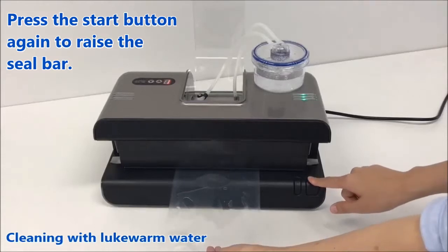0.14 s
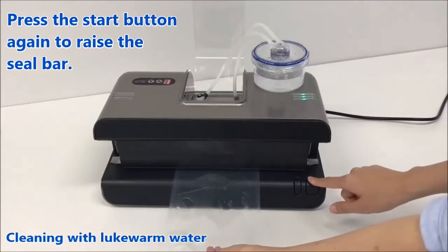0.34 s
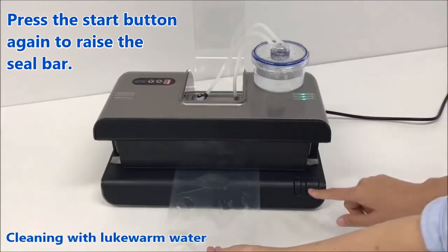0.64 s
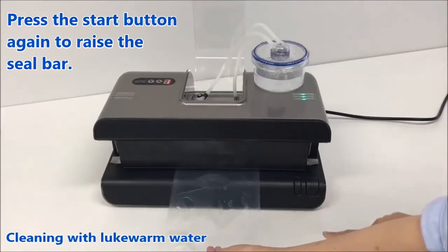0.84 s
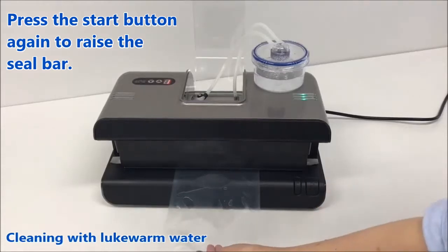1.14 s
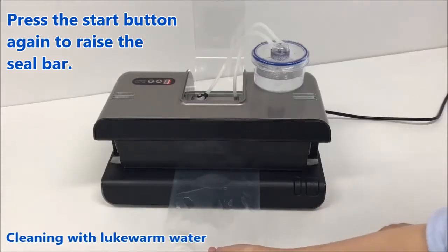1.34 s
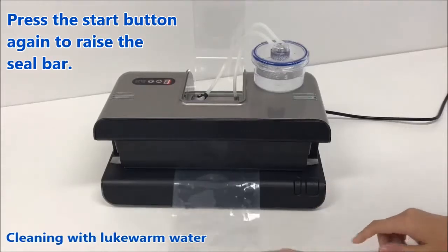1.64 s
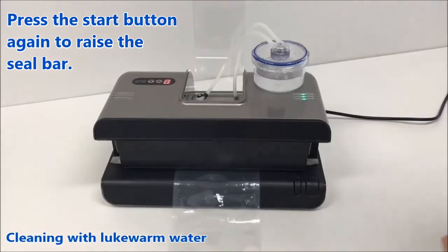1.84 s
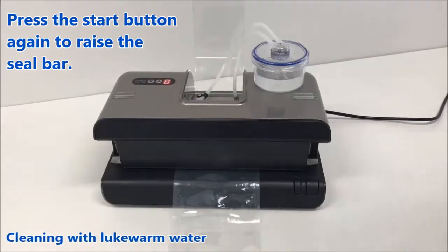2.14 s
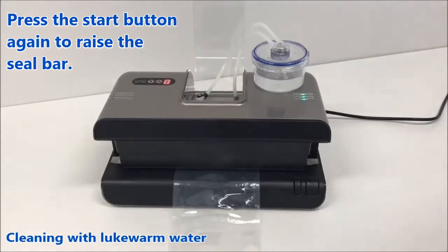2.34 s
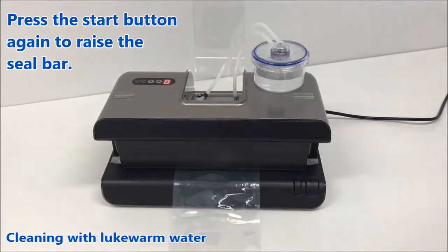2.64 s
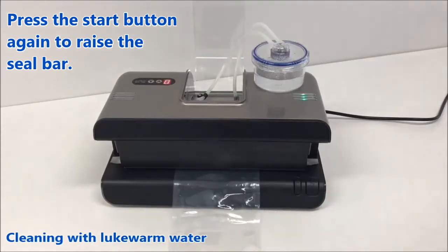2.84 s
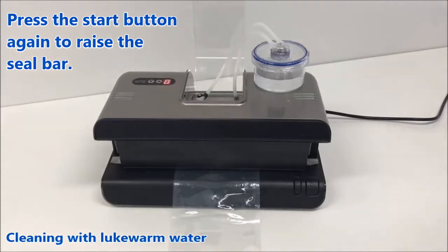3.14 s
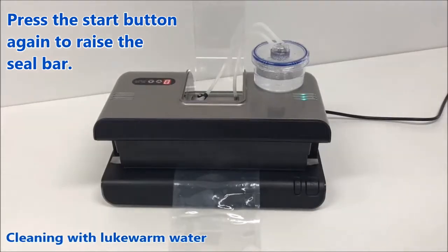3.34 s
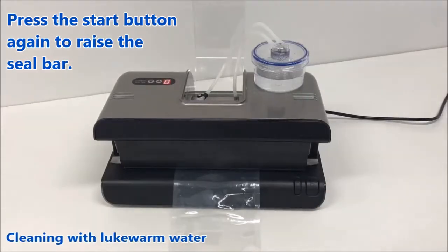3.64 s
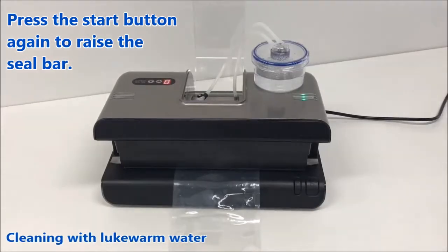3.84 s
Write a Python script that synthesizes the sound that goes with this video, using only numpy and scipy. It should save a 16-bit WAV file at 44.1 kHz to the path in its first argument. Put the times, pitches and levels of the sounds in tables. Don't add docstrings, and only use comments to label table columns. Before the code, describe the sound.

Vacuum sealer motor cuts off, then a hissing, whistling air release sputters wetly into quiet.

```python
import sys
import numpy as np
from scipy import signal
from scipy.fft import rfft, irfft
from scipy.io import wavfile

SR = 44100
rng = np.random.default_rng(int(sys.argv[2]) if len(sys.argv) > 2 else 0)


def int16_out(signal):
    q = np.round(np.clip(np.atleast_2d(signal).T, -1, 1) * 32767)
    wavfile.write(sys.argv[1], SR, q.astype(np.int16))


def makeup_ratio(level_db):
    decades = np.asarray(level_db, float) / 20
    return 10 ** decades


N = 176400

# (order, level/dB)
SHAFT_ORDERS = [(1, -14), (2, 0), (3, -8), (4, -13), (5, -5), (6, -6), (7, -2.5), (8, -11), (9, -16),
                (10, -14), (11, -20), (12, -18), (13, -13), (14, -29), (15, -25), (16, -24), (17, -23),
                (18, -23), (19, -25), (20, -11), (21, -20), (22, -16), (23, -29), (24, -27), (25, -26),
                (26, -19), (27, -19), (28, -21), (29, -30), (30, -23), (31, -24), (32, -25)]
# (f/Hz, level/dB, T60/s)
HOUSING_MODES = [(2990, -41, 0.023), (3850, -33.5, 0.0065), (4740, -34, 0.011), (5670, -36, 0.014)]
# (f/Hz, level/dB, T60/s)
VALVE_MODES = [(1100, -42, .02), (1450, -36, .022), (1700, -36, .022)]
# (f/Hz, density level/dB per Hz)
RATTLE_SPECTRUM = [(90, -19), (368, -5.5), (480, -14.5), (1000, -7.5), (1700, -15.5), (2200, -21),
                   (3830, -17), (15600, -33)]
# (t/s, f/Hz, level/dB)
ROTOR_WHINE = [
    (0, 3756, -39.5),
    (.11, 3726, -42),
    (.16, 3816, -47.5),
    (.27, 3910, -52),
    (.33, 3880, -63),
]
PUMP_HZ, PUMP_DB, RATTLE_DB, RATTLE_GATE = 52.58, -33.5, -37.5, 0.2
WOBBLE_DB, KNOCK_SPREAD_DB, VALVE_LAG_TURNS = .6, 1.8, .6
OFF_S, COAST_S, COAST_LOSS, OFF_DROP_DB, TONE_DROP_DB = .275, .16, 1.04, -3, -7
RATTLE_SPLIT_HZ, BRIGHT_COAST_S, RUMBLE_DB, RUMBLE_S = 1250, 0.079, -45, 0.18

# (t/s, level/dB)
FLOW_LEVEL = [
    (0, -54),
    (.3, -49),
    (.85, -51),
    (.97, -51.5),
    (1.3, -56),
    (1.42, -55),
    (1.8, -57.5),
    (1.9, -63.5),
    (2.14, -77.5),
    (2.6, -78),
]
# (f/Hz, density level/dB per Hz)
HISS_SPECTRUM = [(500, -12), (1500, -14), (2800, -22), (3500, -17), (7110, -2.5), (10400, -3),
                 (12200, -6.5), (15600, -6)]
# (f/Hz, width/Hz, level/dB)
PASSAGE_MODES = [(3820, 1150, -5), (5460, 1100, -6), (6930, 600, -13), (9890, 100, -11.5),
                 (11700, 250, -14), (12630, 460, -10)]
HISS_DB, SEEP_DB, SEEP_END_S = 2.5, -69.5, 2.17

# (t/s, f/Hz, level/dB, roughness 0-1)
DRY_WHISTLE = [(.47, 7180, -47, 0.8), (.52, 7240, -51.5, 0.64), (0.749, 7200, -54.5, 0.9),
               (0.849, 7130, -46.5, 0.44), (.865, 6820, -59, 1.1), (0.961, 6330, -55.5, 1),
               (1.08, 6134, -50.5, 0.3), (1.259, 5774, -46, 0.25), (1.38, 5305, -46, 0.42),
               (1.452, 4870, -53, 0.47), (1.6, 4492, -40, 0.01), (1.667, 4450, -36, 0.06)]
# (t/s, f/Hz, level/dB, roughness 0-1)
WET_WHISTLE = [
    (1.678, 4200, -54, .5),
    (1.697, 4240, -45.5, 0.22),
    (1.706, 4430, -44, .2),
    (1.713, 4270, -50, 0.3),
    (1.735, 4440, -40.5, 0),
    (1.752, 4480, -47, 0.32),
    (1.766, 4720, -47, 0.1),
    (1.797, 4400, -54, .3),
    (1.82, 4170, -64, 0.9),
]
# (f/Hz, level/dB)
OVERTONE_RADIATION = [(8900, -28), (10300, -12), (11000, -9), (11700, -5), (12700, -1), (13400, -20),
                      (14000, -12), (15500, -18)]
WHISTLE_WIDTH_HZ, HALO_WIDTH_HZ, HALO_DB, BREAKUP_DB = 70, 400, -6, 2.5
WATER_IN_S, OVERTONES_START_S, CUTOFF_HZ = 1.668, .88, 15720

# (t/s, level/dB, f/Hz)
WHISTLE_DROPS = [(.978, -45, 5500), (1.008, -44, 5400), (1.041, -41, 5400), (1.06, -43, 5400),
                 (1.092, -41, 5350), (1.12, -45, 5500), (1.144, -41, 5450), (1.17, -45, 5500),
                 (1.192, -39, 5450), (1.2, -42, 5500), (1.212, -43, 5500), (1.227, -35, 5400),
                 (1.254, -40, 5450), (1.282, -32, 5250), (1.348, -38, 5150), (1.358, -38, 5200)]
# (t/s, level/dB, f/Hz)
WATER_SPUTTERS = [(0.394, -37.5, 3600), (.857, -46, 3760), (1.674, -35.5, 3650), (1.682, -46, 4600),
                  (1.754, -40, 3860), (1.762, -45, 4600), (1.815, -50, 3900), (1.826, -42.5, 3190),
                  (1.833, -44, 4000), (1.843, -45, 3300), (1.848, -45, 3700), (1.856, -44, 3680),
                  (1.862, -46, 3650), (1.83, -48, 4900), (0.99, -45, 5600), (1.826, -46, 6450),
                  (1.873, -50, 6000), (1.797, -49, 5330), (1.838, -46, 5330), (1.754, -46, 5330),
                  (1.6, -47, 6400), (1.676, -47, 7300), (2, -50, 7900)]
DROP_T60_S, DROP_RISE, SPUTTER_T60_S, SPUTTER_RISE = .022, 12, .03, 3.0
SPRAY_START_S, SPRAY_END_S, SPRAY_PER_S, SPRAY_DB, SPRAY_UNDER = .88, 1.3, 300, -45, .14

# (t/s, peak level/dB, f/Hz, sharp edge level/dB)
BAR_CREAKS = [(.392, -44, 3300, -14), (.485, -50, 1000, -20), (.715, -50, 2000, -20),
              (1.48, -53, 1500, -20), (.545, -50.5, 2490, -20), (.45, -35, 1220, -9),
              (0.545, -46, 1230, -8), (0.761, -40, 3530, 16.5), (.8, -46.5, 1510, 4),
              (0.831, -43, 2590, -12), (.956, -55, 1000, -6), (1.011, -50, 1500, -6),
              (1.159, -45, 2290, -17), (1.4, -52, 982, -17), (1.536, -48, 1164, -8),
              (1.59, -49.5, 1090, -14), (1.67, -49, 4100, 10), (1.752, -49, 3580, -7),
              (1.706, -48.5, 2110, -4), (1.777, -50, 2690, 15), (1.782, -41, 840, -20),
              (1.829, -44.5, 3180, -10)]
CREAK_T60_S, EDGE_T60_S, CREAK_SPREAD, CREAK_TONE_DB = .035, .025, 1.7, -8
# (t/s, level/dB, f/Hz)
TABLE_BUMPS = [
    (0.765, -37, 1055),
    (1.783, -33, 1137),
    (1.79, -42.5, 1250),
    (1.783, -44, 400),
    (2.344, -34, 167),
    (2.345, -42.5, 303),
    (3.91, -52, 840),
    (.452, -44, 1500),
    (.452, -44, 1150),
    (.393, -47, 2400),
]
BUMP_CYCLES, BUMP_T60_S = 12, .022

# (f/Hz, density level/dB per Hz)
SLEEVE_SPECTRUM = [(500, -8), (1200, -4.5), (3000, -2.5), (9010, -3), (12500, -6.5), (15600, -14)]
SLEEVE_S, SLEEVE_WIDTH_S, SLEEVE_LAG_S, SLEEVE_AFTER_S = 2.638, .045, .011, 2.83
SLEEVE_DB, SLEEVE_AFTER_DB = -51.5, -19.5

# (f/Hz, density level/dB per Hz)
AIR_SPECTRUM = [(20, -14), (45, -2), (119, -3), (300, -11.5), (450, -22.5), (1200, -27), (3000, -37),
                (8000, -45.5), (15600, -44.5)]
# (f/Hz, width/Hz, level/dB)
VENTILATION_HUMS = [(64.3, 16, -58.5), (119.7, 14, -55.5), (194, 14, -62.5), (12360, 1500, -75.5)]
# (f/Hz, width/Hz, level/dB)
SPECTRAL_DIPS = [(4826, 290, -6.5), (7610, 330, -6.5), (10480, 380, -14.5)]
AIR_DB, AIR_DIP_SHARE, ROOM_T60_S, ROOM_DB = -52.5, 0.39, .4, -22
# (t/s, low f/Hz, high f/Hz, level/dB)
ANTIPHASE_BURSTS = [
    (.36, 8900, 10400, -62),
    (1.36, 5100, 6300, -48),
    (1.523, 5700, 7600, -64),
    (1.523, 8300, 9700, -64),
    (1.964, 4200, 5200, -76),
    (1.964, 9600, 11000, -78),
]
BURST_S = .009
TICK_START_S, TICK_EVERY_S, TICK_DB = .1, .10238, -52


def pump():
    after = np.maximum(np.arange(N) / SR - OFF_S, 0)
    speed = np.exp(-(after / COAST_S) ** 2 / 2)
    turns = np.cumsum(PUMP_HZ * speed) / SR
    tone = 0
    for order, db in SHAFT_ORDERS:
        phase = 2 * np.pi * (order * turns + rng.random())
        tone = tone + makeup_ratio(db + WOBBLE_DB * drift(8)) * np.sin(phase)
    knocks = mode_knocks(turns, HOUSING_MODES, 0) + mode_knocks(turns, VALVE_MODES, VALVE_LAG_TURNS)
    tone_drop = makeup_ratio(TONE_DROP_DB * np.minimum(after / 0.012, 1))
    tonal = tone_drop * (makeup_ratio(PUMP_DB) * np.sqrt(2) * tone + knocks)

    rattle = coloured(RATTLE_SPECTRUM)
    dull = signal.sosfiltfilt(signal.butter(2, RATTLE_SPLIT_HZ, fs=SR, output="sos"), rattle)
    rattle = dull + (rattle - dull) * np.exp(-after / BRIGHT_COAST_S)
    gust = 1 + RATTLE_GATE * np.cos(2 * np.pi * (turns + 1.12))

    switch_loss = makeup_ratio(OFF_DROP_DB * (1 - np.exp(-after / 0.011)))
    loss = switch_loss * np.exp(-COAST_LOSS * after / COAST_S) * np.sqrt(speed)
    return loss * (tonal + makeup_ratio(RATTLE_DB) * gust * rattle) + coasting_rumble(after) + rotor_whine(after)


def mode_knocks(turns, modes, lag):
    strikes = np.diff(np.floor(turns + .5 - lag), prepend=np.floor(.5 - lag))
    out = 0
    for hz, db, t60 in modes:
        force = makeup_ratio(db + KNOCK_SPREAD_DB * rng.standard_normal(N))
        out = out + ring(strikes * force, hz, t60)
    return out


def coasting_rumble(after):
    noise = narrow(68, 40) + 0.82 * narrow(325, 210)
    return makeup_ratio(RUMBLE_DB) * noise * np.minimum(after / 0.035, 1) * np.exp(-(after / RUMBLE_S) ** 2)


def rotor_whine(after):
    hz, db = in_time(ROTOR_WHINE)
    sine = np.sin(2 * np.pi * np.cumsum(hz) / SR)
    return np.sqrt(2) * makeup_ratio(db + 0.5 * drift(25)) * sine * (after < .06)


def vent_hiss():
    flow_db, = in_time(FLOW_LEVEL)
    t = np.arange(N) / SR
    hiss = makeup_ratio(HISS_DB) * coloured(HISS_SPECTRUM)
    for hz, width_hz, db in PASSAGE_MODES:
        hiss = hiss + makeup_ratio(db + 1.45 * drift(11)) * narrow(hz, width_hz)
    shut = np.clip((2.9 - t) / .3, 0, 1)
    seep = makeup_ratio(SEEP_DB) * (narrow(4000, 1500) + 0.43 * narrow(6100, 1400))
    seep = seep * np.clip((SEEP_END_S - t) / 0.073, 0, 1)
    return seep + shut * makeup_ratio(flow_db + 1.0 * drift(21)) * hiss


def vent_whistle():
    t = np.arange(N) / SR
    hz, db, rough = in_time(DRY_WHISTLE + WET_WHISTLE)
    wet = t > WATER_IN_S
    breakup = 1 - .6 * (t > .5) * ~wet
    db = db + breakup * BREAKUP_DB * drift(45) - 9 * (t < .5) - 6 * (t < .45)
    hz = hz * (1 + .009 * wet * drift(60))
    rough = np.clip(rough, 0, 1)
    phase = 2 * np.pi * np.cumsum(hz) / SR
    out = 0
    for k in (1, 2, 3):
        breathy = complex_drift(k * WHISTLE_WIDTH_HZ)
        halo = complex_drift(k * HALO_WIDTH_HZ / 2)
        gain_db = 0
        if k > 1:
            gain_db = at_hz(OVERTONE_RADIATION, k * hz) - 200 * (k * hz > CUTOFF_HZ) - 8 * wet
            gain_db = gain_db - 15 * (t < OVERTONES_START_S) - 6 * (t < 1.08) + 2.5 * drift(25)
        blur = np.clip(rough + (k > 1) * (t < 1.08), 0, 1)
        voice = np.sqrt(1 - blur ** 2) + blur * breathy + makeup_ratio(HALO_DB) * np.sqrt(k * blur) * halo
        out = out + makeup_ratio(db + gain_db) * np.real(voice * np.exp(1j * k * phase))
    return np.sqrt(2) * out * (t > .28) * (t < 1.88)


def water_drops():
    out = np.zeros(N + SR)
    times, pitch = np.transpose(DRY_WHISTLE)[:2]
    span = SPRAY_END_S - SPRAY_START_S
    spray = []
    for when, soft, under in rng.random((int(SPRAY_PER_S * span), 3)):
        s = SPRAY_START_S + span * when
        hz = np.interp(s, times, pitch) * (1 - SPRAY_UNDER * (0.21 + under))
        spray.append((s, SPRAY_DB - 10 * soft, hz))
    for s, db, hz in WHISTLE_DROPS + spray:
        add(out, s, blip(db, hz, DROP_T60_S, DROP_RISE))
    for s, db, hz in WATER_SPUTTERS:
        add(out, s, blip(db, hz, SPUTTER_T60_S, SPUTTER_RISE))
    return out[:N]


def bar_creaks():
    t = np.arange(SR // 10) / SR
    out = np.zeros(N + SR)
    bright = signal.butter(1, 6000, "high", fs=SR, output="sos")
    for s, db, hz, edge_db in BAR_CREAKS:
        white = rng.standard_normal((2, len(t)))
        limits = [hz / CREAK_SPREAD, hz * CREAK_SPREAD]
        body = signal.sosfilt(signal.butter(2, limits, "band", fs=SR, output="sos"), white[0])
        knock = rms_one(body) * makeup_ratio(db - 60 * t / CREAK_T60_S) * (1 - np.exp(-t / 0.0026))
        knock = knock + blip(db + CREAK_TONE_DB, hz, CREAK_T60_S)
        edge = signal.sosfilt(bright, white[1]) * makeup_ratio(db + edge_db - 60 * t / EDGE_T60_S)
        add(out, s, knock + edge * (1 - np.exp(-t / 0.0019)))
    return out[:N]


def table_bumps():
    out = np.zeros(N + SR)
    for s, db, hz in TABLE_BUMPS:
        add(out, s, blip(db, hz, BUMP_T60_S + BUMP_CYCLES / hz, attack_s=0.0009))
    return out[:N]


def sleeve():
    t = np.arange(N) / SR
    spectrum = rfft(coloured(SLEEVE_SPECTRUM))
    octave = np.log2(12000 / (np.arange(N // 2 + 1) * SR / N + 1))
    out = 0
    for k in range(6):
        weight = np.clip(1 - np.abs(np.clip(octave, 0, 5) - k), 0, 1)
        band = irfft(spectrum * weight, N)
        for s, db in ((SLEEVE_S, 0), (SLEEVE_AFTER_S, SLEEVE_AFTER_DB)):
            out = out + makeup_ratio(db) * band * np.exp(-((t - s - k * SLEEVE_LAG_S) / SLEEVE_WIDTH_S) ** 2 / 2)
    return makeup_ratio(SLEEVE_DB) * out


def room(x):
    t = np.arange(SR // 2) / SR
    tail = signal.lfilter([1], [1, -.7], rng.standard_normal(len(t)))
    tail = tail * makeup_ratio(-60 * t / ROOM_T60_S) * (t > .008)
    return x + makeup_ratio(ROOM_DB) * signal.fftconvolve(x, tail / np.sqrt(np.sum(tail ** 2)))[:N]


def dipped(x, share):
    f = np.arange(N + 1) * SR / N / 2
    dip_db = sum(db / (1 + (2 * (f - hz) / w) ** 2) for hz, w, db in SPECTRAL_DIPS)
    return irfft(rfft(x, 2 * N) * makeup_ratio(share * dip_db), 2 * N)[:N]


def ventilation():
    hums = sum(makeup_ratio(db) * narrow(hz, w) for hz, w, db in VENTILATION_HUMS)
    return makeup_ratio(AIR_DB) * coloured(AIR_SPECTRUM) + hums


def antiphase_bursts():
    t, out = np.arange(N) / SR, 0
    white = rng.standard_normal(N)
    for s, low, high, db in ANTIPHASE_BURSTS:
        band = signal.sosfilt(signal.butter(6, [low, high], "band", fs=SR, output="sos"), white)
        out = out + makeup_ratio(db) * rms_one(band) * np.exp(-((t - s) / BURST_S) ** 2 / 2)
    return out * [[1], [-1]]


def electric_ticks():
    ticks = np.zeros(N)
    at = (np.arange(TICK_START_S, N / SR, TICK_EVERY_S) * SR).astype(int)
    ticks[at] = makeup_ratio(TICK_DB + 2 * rng.standard_normal(len(at)))
    return 2.5 * signal.sosfilt(signal.butter(2, 12500, "high", fs=SR, output="sos"), ticks)


def rms_one(x):
    return x / np.sqrt(np.mean(np.abs(x) ** 2) + 1e-20)


def in_time(rows):
    s, *columns = np.transpose(rows)
    return [np.interp(np.arange(N) / SR, s, c) for c in columns]


def at_hz(points, hz):
    f, db = np.transpose(points)
    return np.interp(np.log(hz), np.log(f), db)


def coloured(points):
    gain = makeup_ratio(at_hz(points, np.arange(N // 2 + 1) * SR / N + 1))
    return rms_one(irfft(rfft(rng.standard_normal(N)) * gain, N))


def narrow(hz, width_hz):
    f = np.arange(N // 2 + 1) * SR / N
    return rms_one(irfft(rfft(rng.standard_normal(N)) / (1 + (2 * (f - hz) / width_hz) ** 2), N))


def drift(rate):
    return narrow(0, 2 * rate)


def complex_drift(rate):
    return (drift(rate) + 1j * drift(rate)) / np.sqrt(2)


def ring(clicks, hz, t60):
    r, w = makeup_ratio(-60 / (t60 * SR)), 2 * np.pi * hz / SR
    return signal.lfilter([0, np.sin(w)], [1, -2 * r * np.cos(w), r * r], clicks + 1e-18)


def blip(db, hz, t60, rise=0., attack_s=0.00048):
    t = np.arange(SR // 10) / SR
    envelope = makeup_ratio(db - 60 * t / t60) * (1 - np.exp(-t / attack_s))
    return envelope * np.sin(2 * np.pi * hz * t * (1 + rise * t / 2))


def add(out, s, x):
    out[int(s * SR):int(s * SR) + len(x)] += x


def scene():
    sealer = pump() + vent_hiss() + vent_whistle()
    near = sealer + water_drops() + bar_creaks() + table_bumps() + sleeve()
    mono = dipped(room(near), 0.96) + dipped(ventilation(), AIR_DIP_SHARE)
    return np.tile(mono, (2, 1))


def roll_off(x):
    return signal.sosfilt(signal.butter(12, 15720, fs=SR, output="sos"), x)


def record(dry):
    f = np.arange(N + 1) * SR / N / 2
    mix = dry + electric_ticks() + antiphase_bursts()
    mix = irfft(rfft(mix, 2 * N) * (f < CUTOFF_HZ), 2 * N)[:, :N]
    return roll_off(mix)


dry = scene()
out = record(dry)
int16_out(out)
```